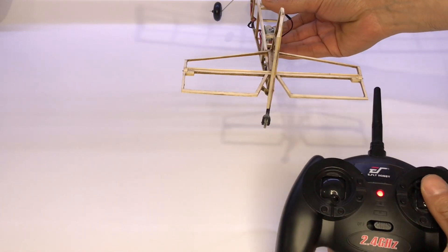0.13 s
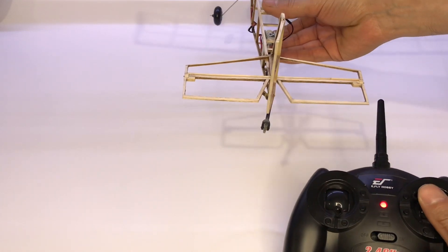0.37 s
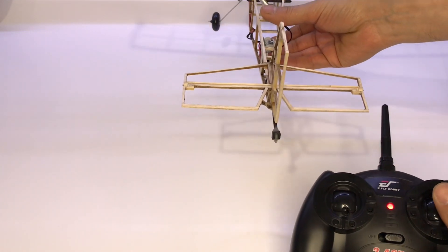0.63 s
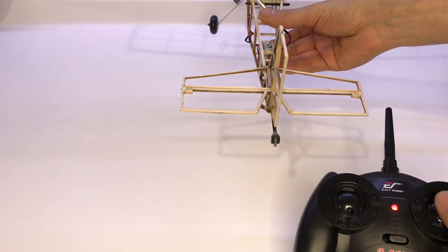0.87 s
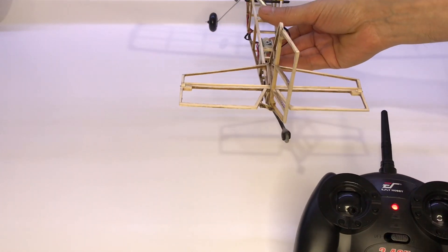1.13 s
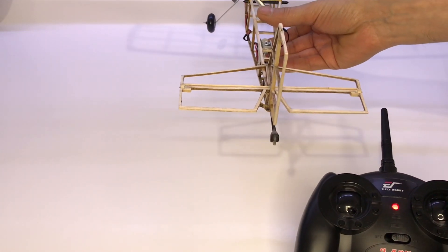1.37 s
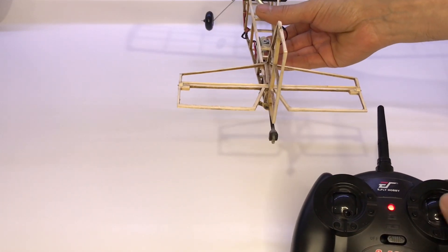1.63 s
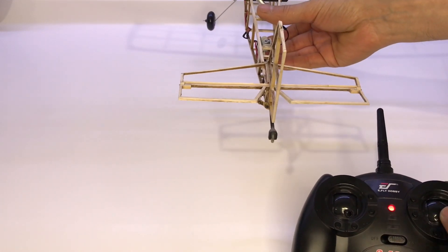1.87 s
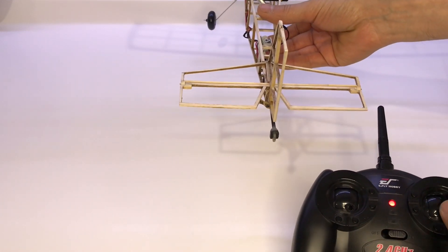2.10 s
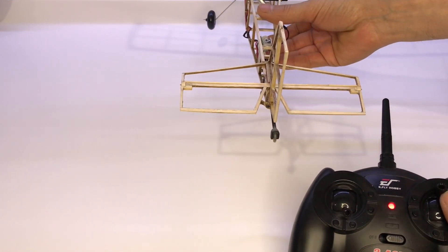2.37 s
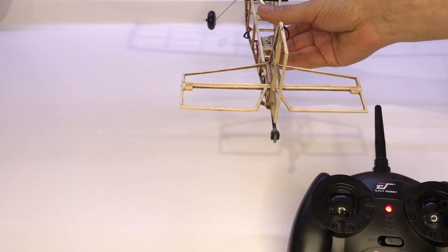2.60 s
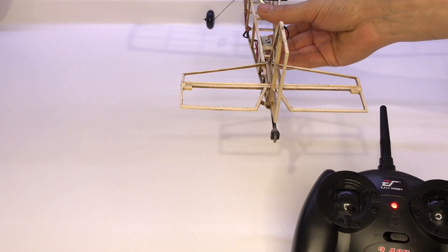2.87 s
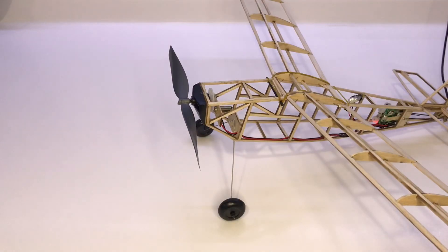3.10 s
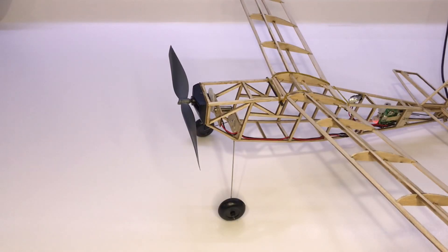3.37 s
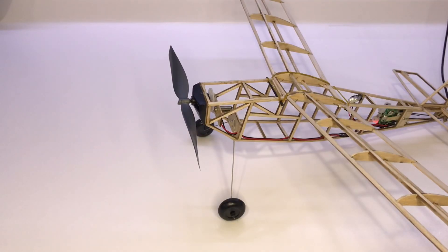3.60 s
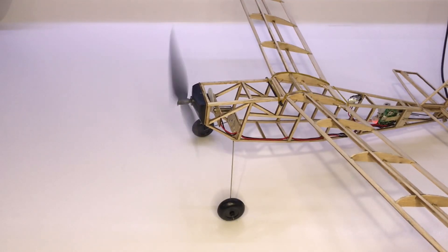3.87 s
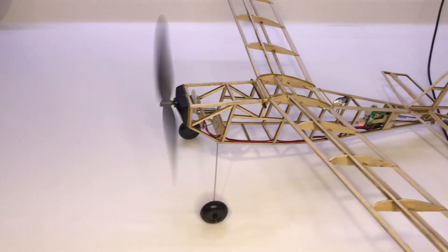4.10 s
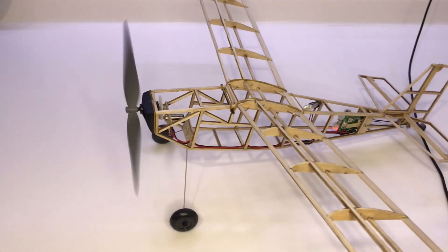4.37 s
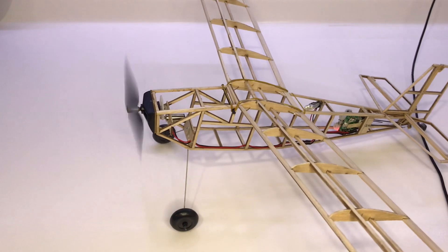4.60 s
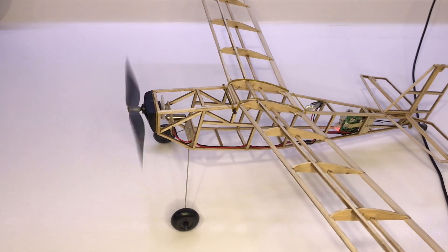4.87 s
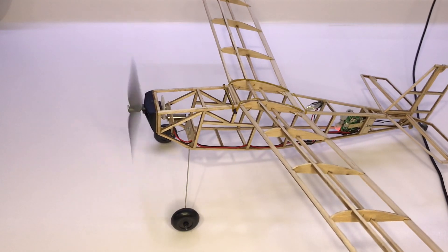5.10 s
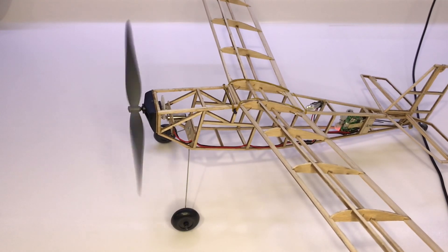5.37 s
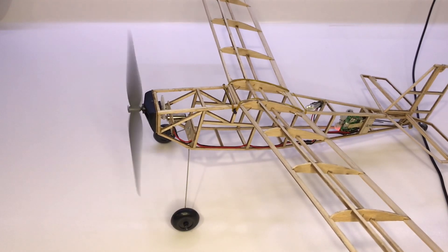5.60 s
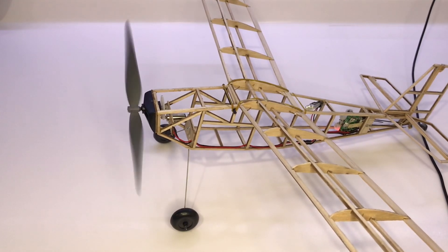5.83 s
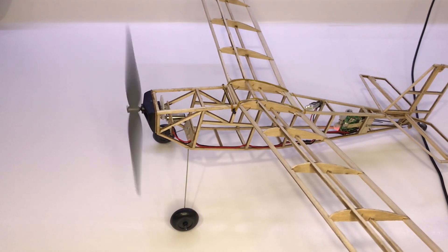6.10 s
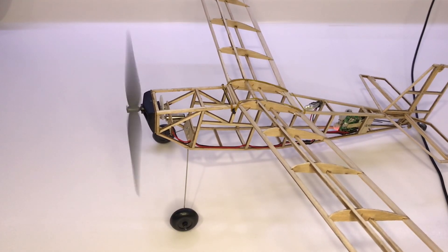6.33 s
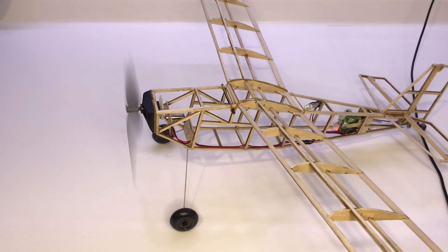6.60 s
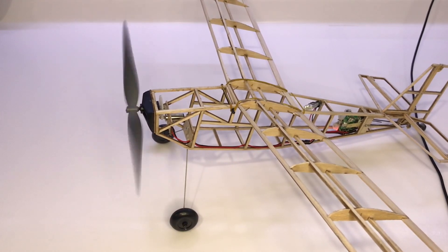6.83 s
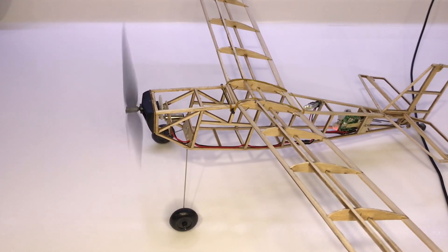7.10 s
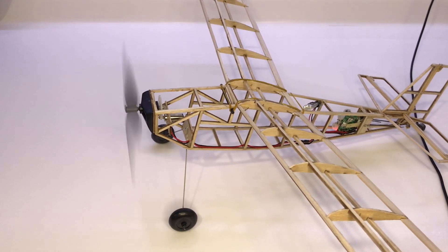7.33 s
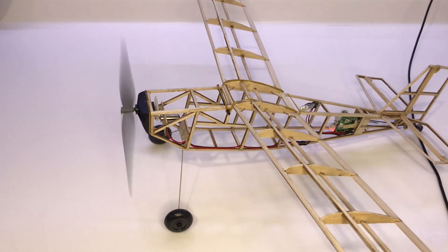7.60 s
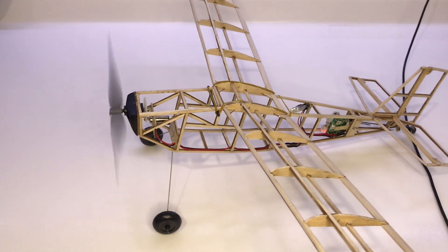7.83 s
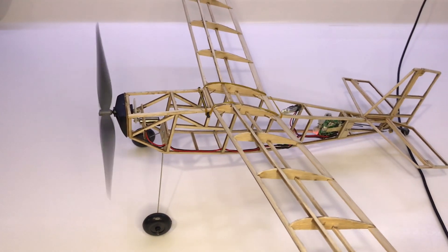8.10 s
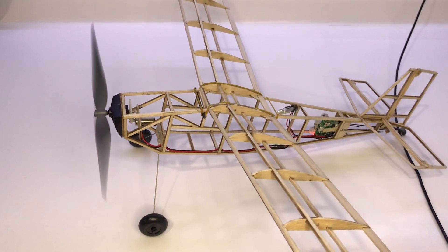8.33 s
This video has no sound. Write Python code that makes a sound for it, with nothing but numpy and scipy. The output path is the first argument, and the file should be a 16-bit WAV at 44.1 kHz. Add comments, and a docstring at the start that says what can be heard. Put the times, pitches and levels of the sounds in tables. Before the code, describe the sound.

Brief gritty servo buzzes and plastic clacks in a quiet room, then an electric propeller motor bursts, rattles down, and climbs to a steady whine.

```python
"""A balsa model aeroplane on a table in a quiet room, over a low steady hum.
From 0 s small servos whirr (dense gear clicks), control sticks knock (damped modes), a faint treble tick repeats.
At 3.8 s a geared motor spins the propeller up (shaft orders, tooth contacts), then coasts in chattering bursts.
From 5 s it runs up again to a steady whine over the singing of its speed controller (harmonics of a pulse).
"""
import sys
import numpy as np
from scipy import signal
from scipy.fft import rfft, irfft
from scipy.io import wavfile
from scipy.ndimage import uniform_filter1d

SR = 44100
rng = np.random.default_rng(int(sys.argv[2]) if len(sys.argv) > 2 else 0)


def generate_wav(signal):
    """Clip the signal to [-1, 1] and save it as 16-bit WAV at the path in sys.argv[1]."""
    frames = np.transpose(np.atleast_2d(signal))
    scaled = np.clip(frames, -1, 1) * 32767
    pcm = np.round(scaled).astype(np.int16)
    wavfile.write(sys.argv[1], SR, pcm)


def undo_db(level):
    """Turn decibels back into plain size, where 20 dB means ten times bigger."""
    steps = np.asarray(level, float) / 20
    return 10 ** steps


N = 373086

# background spectrum: [f/Hz, relative level/dB]
FLOOR_SPECTRUM = [(30, -3.5), (53, -5.5), (126, -12.5), (217, -13.5), (292, -17.5), (415, -17.5),
                  (700, -17), (1100, -21.5), (1600, -29.5), (3200, -30.5), (8000, -38.5), (15500, -40)]
# humming of far appliances: [f/Hz, width/Hz, level/dB]
APPLIANCE_PEAKS = [(49, 6.5, 10.5), (99.9, 9.6, 13), (250, 8.7, 10.5), (296.7, 13.3, 12.5), (733, 6.7, 15)]
HUM_DB = -60
# rustle of hands: [t/s, level/dB]
RUSTLE_LEVEL = [(0, -89), (2.94, -89), (3.0, -67.5), (3.3, -71), (3.55, -63), (3.75, -79), (8.46, -59.5)]
# brief dip in the background level: (t/s, half length/s, level/dB)
BACKGROUND_DIP = (2.927, 0.028, -23)

# nudges of the table top: [t/s, f/Hz, level/dB before the low-pass, t60/s]
TABLE_NUDGES = [(.54, 194, -37.5, 0.12), (0.48, 150, -59, 0.11), (4.101, 257, -51, 0.43),
                (4.16, 157, -53, 0.26), (6.282, 125.6, -47.5, 0.39)]

# trains of faint treble ticks: [first t/s, last t/s]
TICK_TRAINS = [(.0309, 2.9), (3.0296, 3.75)]
TICK_PERIOD_S, TICK_DB = .1024, -70.5   # level ahead of the colouring

# pulse duty of the speed controller, one list per run: [t/s, duty (0-1)]
DUTY_COURSES = [
    [(3.757, .37), (3.8, .385), (3.84, .41), (3.9, .4), (3.96, .42), (4.08, .413), (4.14, .43), (4.2, .453),
     (4.31, .468)],
    [(5.041, .13), (5.4, .127), (5.95, .135), (6.05, .148), (6.33, .15), (6.37, .161), (6.92, .167),
     (7.03, .168), (7.12, .182), (7.35, .19), (7.6, .197), (7.95, .195), (8.12, .203), (8.46, .203)],
]
# response of the winding to harmonics 1, 2, ..: [level/dB]
WINDING_RESPONSE = [-54.5, -47.5, -60.5, -60, -55, -50.5, -53, -57.5, -50.5, -43, -39.5, -33, -48, -58, -49]
SWITCH_RATE_HZ, SAG_S = 1007.7, .045
# starting current loads the battery and the switching rate sags: [deepest t/s, f/Hz lost]
BATTERY_SAGS = [(3.8, 31), (5.04, 12.7)]
# weakening or swelling of the singing: [t/s, half length/s, level/dB]
SINGING_FADES = [(3.865, 0.2, -2), (4.255, 0.19, -10), (5.1, .4, 2.5), (7.8, 0.23, -7.5)]

# knocks of the control sticks: [t/s, strike level/dB, brightness/(dB per octave),
# crack level/dB re strike, spring level/dB re strike]
STICK_KNOCKS = [(0.245, -43.5, -5, -3, -38), (0.539, -49, -14, 3.5, -35), (0.607, -33.5, -3, -9.5, -42),
                (1.011, -41, -3, -4.5, -28), (1.249, -33.5, -7, 4.5, -26.5), (1.758, -35, 5, -13, -45),
                (1.996, -25, 6.5, -12, -29.5), (2.293, -50.5, 2, 4, -29), (2.463, -35.5, 2, -11, -23),
                (3.203, -52.5, 0, -0.5, -32), (3.379, -43, -10, 5, -36), (4.319, -35.5, -5, 0, -34)]
# modes of the plastic case: [f/Hz, level/dB, t60/s]
CASE_MODES = [(427, -21.5, 0.082), (751, -5.5, 0.049), (925, -12.5, 0.13), (1550, 5, 0.029),
              (2270, -17, 0.033), (3170, -14, 0.027), (4160, -18, 0.032), (5360, -29, .03)]
# creaks of the stick spring: [t/s, length/s, slips per s, slip level/dB]
SPRING_CREAKS = [(2.152, .048, 736, -58), (2.45, .045, 522, -57), (.49, .03, 700, -72)]
# mode of the centring spring: (f/Hz, t60/s)
SPRING_MODE = (1530, 0.54)

# spectrum of the servo gears: [f/Hz, relative level/dB]
SERVO_SPECTRUM = [(1000, -30.5), (1700, -29.5), (1880, -18.5), (2080, -20.5), (2460, -25.5), (3070, -29),
                  (3460, -18.5), (4250, -17), (4570, -20), (6500, -10), (7680, -10.5), (8900, -6.5),
                  (10200, -7), (11900, 3), (15500, -5)]
# resonances of the servo case: [f/Hz, width/Hz, level/dB]
SERVO_RESONANCES = [(1900, 54, -5), (2420, 67, 6), (3300, 140, 7.5), (3880, 100, 5.5), (4560, 130, 7),
                    (5150, 120, 2.5), (6200, 180, 3.5), (9060, 280, 3), (12100, 350, -1.5)]
# servo moves: [three shape times t/s, not always in order, gear buzz level/dB at the second,
# level drop/dB from the second to the third (negative: rise)]
SERVO_MOVES = [(0.063, .108, 0.2, -32.5, 18.5), (0.2, 0.239, 0.21, -36, -1), (0.474, .512, 0.57, -37.5, 20),
               (0.564, .606, 0.63, -36, -1.5), (0.891, 0.97, 1.046, -35, 4.5), (1.045, 1.09, 1.136, -36, 5),
               (1.15, 1.17, 1.09, -46, -1), (1.207, 1.292, 1.317, -29.5, 9),
               (1.336, 1.372, 1.347, -40.5, -11), (1.638, 1.678, 1.735, -31.5, 1.5),
               (1.972, 2.042, 2.042, -29, -1), (2.238, 2.26, 2.415, -36, 3.5),
               (2.47, 2.526, 2.534, -30, -4)]
MOVE_ATTACK_S, MOVE_RISE_DB, MOVE_SWELL_DB = 0.021, 32, 6.5   # fast rise, then a slower swell
MOVE_RELEASE_S, MOVE_FALL_DB = 0.043, 45
# a stalled servo sings: (start t/s, end t/s)
STALL_START_S, STALL_END_S = 1.765, 1.985
STALL_FADE_S, STALL_BUZZ_DB = 0.019, -62
LOW_BUZZ_DB, LOW_FOLLOWS = -47, 0.75   # low part when the buzz is at -35 dB; share of its swing
# tones of the stalled servo: [f/Hz, level/dB]
STALL_TONES = [(6045, -80), (8064, -74), (9071, -79), (11052, -84), (11090, -70), (12096, -62),
               (13114, -86), (14115, -81), (15122, -68)]

PINION_TEETH, WHEEL_TEETH = 8, 84
# motor power: [on t/s, off t/s]
POWERED_RUNS = [(3.757, 4.31), (5.04, 8.46)]
POWER_ATTACK_S, POWER_RELEASE_S = .006, 0.056
# speed the throttle asks for, one list per run: [t/s, tooth contacts per s]
THROTTLE_DEMAND = [
    [(3.757, 852), (3.84, 1556), (3.9, 2080), (4.31, 2213)],
    [(5.04, 748), (5.2, 1462), (5.5, 1631), (5.8, 1690), (6.3, 1837), (6.8, 1914), (7.35, 2064),
     (7.8, 2156), (8.46, 2152)],
]
SPIN_LAG_S, COAST_LAG_S, KICK_PER_S = .1, .41, 150   # kick: tooth contacts per s at the first start
CRUISE_PER_S = 2000   # tooth contacts per s at which the cruise levels hold
# level laws of the motor layers: (level/dB at cruise, dB per octave of speed, dB at full torque,
# dB lost unpowered, dB per octave unpowered)
HISS_LAW = (-34, 4.5, 1.5, 10, 11)
RATTLE_LAW = (-46, 0.8, 4.5, 13, 3.5)
WHINE_LAW = (-35.5, 12, -0.5, 18.5, 6.5)
# slow wavering of the motor's loudness: [t/s, level/dB]
MOTOR_WAVERING = [(3.76, -2.5), (3.85, 3.1), (3.94, -2.5), (4.03, 1.1), (4.15, 0.1), (4.3, -1.1),
                  (4.6, 1.3), (5.0, -0.6), (5.05, 0.5), (5.15, -1.1), (5.3, -1.1), (5.45, -0.2), (5.6, 1.4),
                  (6.0, 0.35), (6.5, 1.6), (7.0, 0.4), (7.5, 1.36), (7.8, 0.5), (8.4, 0.6)]
# lines of the whine: [multiple of shaft speed]
WHINE_ORDERS = [1, 4, 7, 8, 9, 10, 13, 14, 15, 16, 17, 24, 32]
# their strengths, in the same order: [level/dB]
WHINE_ORDER_LEVELS = [-13.5, -25.5, -14.5, 0, -13.5, -46, -33, -15.5, -10.5, -2, -12.5, -0.5, -4]
# load swing at 1, 2, .. times propeller speed: [depth at full slack]
WHEEL_RUNOUT = [.55, .3, .1, .3, .1, .1]
# resonances of the frame: [f/Hz, width/Hz, level/dB]
FRAME_RESONANCES = [(1020, 230, 8.5), (1434, 230, 5), (2094, 63, 6), (2380, 320, 6), (2601, 240, 14),
                    (3720, 950, 9), (4054, 265, -10.5), (4380, 270, -5.5), (4610, 150, 3.5), (7190, 430, 7),
                    (8170, 320, 6)]
# spectrum of the tooth rattle: [f/Hz, relative level/dB]
RATTLE_SPECTRUM = [(400, -62), (900, -28), (1600, -7.5), (1900, 0.5), (2600, -9.5), (2900, -2.5),
                   (5000, -8.5), (8000, -8), (12000, -56.5)]
# spectrum of the motor hiss: [f/Hz, relative level/dB]
HISS_SPECTRUM = [(3000, -26), (4500, -9.5), (6000, -8), (7200, -12), (8500, -4.5), (9800, 1), (11400, -9.5),
                 (12500, 1.5), (14300, 5), (15700, 2)]

ROOM_T60_S, ROOM_DB = 0.33, -6
STICKS_ROOM_DB = -5   # the sticks are close by, so the room answers them less
# notch in the microphone's treble: (f/Hz, width/Hz, level/dB)
MICROPHONE_NOTCH = (10450, 130, -21)
# pass band of the whole sound, rumble removed and nothing above 16 kHz: [f/Hz, level/dB]
PASS_BAND = [(20, -50), (45, 0), (15750, 0), (16000, -70)]


def rms_one(x):
    """Normalisation: scales a signal to unit root mean square."""
    return x / np.sqrt(np.mean(x ** 2) + 1e-20)


def in_time(rows, outside=None):
    """Linear interpolation of each column over time; `outside` holds beyond the first and last rows."""
    s, *columns = np.transpose(rows)
    return [np.interp(np.arange(N) / SR, s, c, outside, outside) for c in columns]


def in_bursts(tables):
    """Gating: columns of several tables laid end to end, and a mask of where any is playing."""
    playing = sum(in_time([(t[0][0], 1), (t[-1][0], 1)], outside=0)[0] for t in tables)
    return in_time([row for t in tables for row in t]), playing


def level_bend(s, half_s, db):
    """Level modulation: a V-shaped dip, or a swell if positive, in dB."""
    return in_time([(s - half_s, 0), (s, db), (s + half_s, 0)])[0]


def drift(rate):
    """Random modulation: Gaussian knots of unit spread, `rate` per second, joined by straight lines."""
    knots = int(N / SR * rate) + 2
    return np.interp(np.arange(N) * rate / SR, np.arange(knots), rng.standard_normal(knots))


def colour(x, points, peaks=(), size=8192):
    """Minimum-phase filtering: a folded cepstrum makes a spectrum with resonances causal."""
    hz = np.maximum(np.fft.rfftfreq(size, 1 / SR), 1)
    point_hz, point_db = np.array(points).T
    db = np.interp(np.log(hz), np.log(point_hz), point_db)
    for centre_hz, width, peak_db in peaks:
        db = db + peak_db / (1 + (2 * (hz - centre_hz) / width) ** 2)
    cepstrum = irfft(np.log(undo_db(np.maximum(db, -90))))
    cepstrum[1:size // 2] *= 2
    cepstrum[size // 2 + 1:] = 0
    return signal.fftconvolve(x, irfft(np.exp(rfft(cepstrum))))[:N]


def grains(per_s, spread_db):
    """Shot noise: random clicks of uneven size and sign."""
    sizes = undo_db(spread_db * np.minimum(rng.exponential(1, N), 5)) * rng.choice([-1, 1], N)
    return sizes * (rng.random(N) < per_s / SR)


def impulses(at, db):
    """Impulsive excitation: single-sample blows of given levels at given samples."""
    blows = np.zeros(N)
    blows[at] = undo_db(db)
    return blows


def ring(clicks, hz, t60):
    """Damped resonance: a two-pole mode falls by 60 dB in t60 seconds after each click."""
    r, w = undo_db(-60 / (t60 * SR)), 2 * np.pi * hz / SR
    return signal.lfilter([0, np.sin(w)], [1, -2 * r * np.cos(w), r * r], clicks + 1e-18)


def decay(clicks, t60):
    """Exponential decay: each click starts an envelope that falls by 60 dB in t60 seconds."""
    return signal.lfilter([1], [1, -undo_db(-60 / (t60 * SR))], clicks)


def room_noise():
    """Coloured noise: a low steady hum through resonances, and a light rustle of hands made of grains."""
    hum = rms_one(colour(rng.standard_normal(N), FLOOR_SPECTRUM, APPLIANCE_PEAKS))
    brushing = grains(2500.0, spread_db=3.0) * undo_db(2.0 * drift(25))
    rustle = rms_one(colour(brushing, [(300, -12), (900, -3), (2800, 0), (5000, -4), (9000, -14), (15000, -16)]))
    return undo_db(level_bend(*BACKGROUND_DIP)) * (undo_db(HUM_DB) * hum + undo_db(in_time(RUSTLE_LEVEL)[0]) * rustle)


def room(x):
    """Reverberation: convolution with a diffuse, exponentially decaying tail, duller than the direct sound."""
    t = np.arange(SR // 2) / SR
    tail = rng.standard_normal(len(t)) * undo_db(-60 * t / ROOM_T60_S) * (t > .004)
    tail = signal.lfilter([1], [1, -.65], tail)
    return undo_db(ROOM_DB) * signal.fftconvolve(x, tail / np.sqrt(np.sum(tail ** 2)))[:N]


def nudges():
    """Modal excitation: soft nudges of the table top each ring one low mode."""
    out = np.zeros(N)
    for s, hz, db, t60 in TABLE_NUDGES:
        out += ring(impulses(int(s * SR), db), hz, t60)
    return signal.lfilter([.05], [1, -.95], out)


def ticks():
    """Periodic noise bursts: a short decaying puff of treble, over and over."""
    marks = np.zeros(N)
    for first, last in TICK_TRAINS:
        at = (np.arange(first, last, TICK_PERIOD_S) * SR).astype(int)
        marks[at] = undo_db(TICK_DB + rng.normal(0, 2.1, 40)[:len(at)])
    puff = decay(marks, t60=.012) * rng.standard_normal(N)
    return colour(puff, [(3000, -26), (9000, 2), (13000, 12)])


def sticks():
    """Modal excitation: knocks and spring slips strike the same case modes; knocks add a crack and a spring."""
    slips, out = np.zeros(N), np.zeros(N)
    for start, length, per_s, db in SPRING_CREAKS:
        at = start + np.cumsum(rng.normal(1, 0.15, 60).clip(.3)) / per_s
        slips[(at[at < start + length] * SR).astype(int)] = undo_db(db)
    s, strike_db, tilt_db, crack_db, spring_db = np.transpose(STICK_KNOCKS)
    at = (s * SR).astype(int)
    # every knock excites the modes in its own proportions
    strengths = rng.normal(0, 3.6, (len(at), len(CASE_MODES)))
    for k, (hz, db, t60) in enumerate(CASE_MODES):
        blows = slips * float(k < 5)   # slips reach only the five lowest modes
        blows[at] = undo_db(strike_db - 10.0 + strengths[:, k] + tilt_db * np.log2(hz / 1500))
        out += undo_db(db) * ring(blows, hz, t60)
    out += ring(impulses(at, strike_db + spring_db), *SPRING_MODE)
    crack = decay(impulses(at, strike_db + crack_db), t60=0.065) * rng.standard_normal(N)
    return out + colour(crack, [(300, -5.5), (1000, 4.0), (4000, 1.0), (7000, -7.5), (15000, -19)])


def servo_effort():
    """Maximum of envelopes: moves rise fast, most then swell and drop; the strongest at each moment counts."""
    shapes = []
    for first, second, third, db, drop_db in SERVO_MOVES:
        shape = [(first, db - MOVE_SWELL_DB - MOVE_RISE_DB),
                 (min(first + MOVE_ATTACK_S, second - .001), db - MOVE_SWELL_DB),
                 (second, db),
                 (third, db - drop_db),
                 (third + MOVE_RELEASE_S, db - drop_db - MOVE_FALL_DB)]
        shapes.append(in_time(shape, outside=-200)[0])
    return np.max(shapes, axis=0)


def servos():
    """Shot noise through resonances: tiny plastic gears chatter in clumps; effort sets the buzz, a stall sings."""
    half = STALL_FADE_S / 2
    stall = [(STALL_START_S - half, -25), (STALL_START_S + half, 0), (STALL_END_S - half, 0), (STALL_END_S + half, -25)]
    stall_db = in_time(stall, outside=-200)[0]
    buzz_db = np.maximum(servo_effort(), STALL_BUZZ_DB + stall_db)
    clumps = undo_db(1.2 * drift(700) + 0.87 * drift(90))
    chatter = colour(grains(9000.0, spread_db=3.5) * clumps, SERVO_SPECTRUM, SERVO_RESONANCES)
    low = signal.sosfilt(signal.butter(2, 5700, fs=SR, output="sos"), chatter)
    low_db = LOW_BUZZ_DB + LOW_FOLLOWS * (buzz_db + 35)
    buzz = undo_db(buzz_db) * rms_one(chatter - low) + undo_db(low_db) * rms_one(low)
    t = np.arange(N) / SR
    song = np.zeros(N)
    for hz, db in STALL_TONES:
        song += undo_db(db + 2.0 * drift(39.8)) * np.sqrt(2) * np.sin(2 * np.pi * hz * t)
    return buzz + undo_db(stall_db) * song


def controller():
    """Fourier series of a pulse: the winding sings; harmonic k of duty d has strength sin(pi k d)."""
    out, t = np.zeros(N), np.arange(N) / SR
    (duty,), playing = in_bursts(DUTY_COURSES)
    sag = np.zeros(N)
    for deepest, hz in BATTERY_SAGS:
        since = (1 + (t - deepest) / SAG_S).clip(0, 50)
        sag += hz * since * np.exp(1 - since)
    phase = 2 * np.pi * np.cumsum(SWITCH_RATE_HZ - sag) / SR
    for k, db in enumerate(WINDING_RESPONSE, start=1):
        strength = np.sin(np.pi * k * duty) + 0.082 * drift(60)
        out += undo_db(db + 0.43 * drift(30)) * np.sqrt(2) * strength * np.sin(k * phase + k * k)
    return playing * undo_db(sum(level_bend(*fade) for fade in SINGING_FADES)) * out


def speed():
    """First-order lag: the tooth rate trails the demand while powered and decays exponentially without power."""
    out, t = np.full(N, float(KICK_PER_S)), np.arange(N) / SR
    r = np.exp(-1 / (SPIN_LAG_S * SR))
    for demand, (on, off) in zip(THROTTLE_DEMAND, POWERED_RUNS):
        driven, after = (t >= on) & (t < off), t >= off
        now = out[driven][0]
        out[driven] = signal.lfilter([1 - r], [1, -r], in_time(demand)[0][driven], zi=[r * now])[0]
        out[after] = out[driven][-1] * np.exp(-(t[after] - off) / COAST_LAG_S)
    return out


def layer_db(law, rate, torque, coasting):
    """Power law: level changes with speed and torque, plus a slow wavering, and drops when the power goes."""
    cruise_db, slope_db, torque_db, lost_db, coast_slope_db = law
    octaves = np.log2(rate / CRUISE_PER_S)
    driven = slope_db * octaves + torque_db * torque
    unpowered = coast_slope_db * octaves - lost_db
    return cruise_db + in_time(MOTOR_WAVERING)[0] + (1 - coasting) * driven + coasting * unpowered


def gear_whine(shaft, wheel, play, runout, torque):
    """Order synthesis: sines at multiples of shaft speed, modulated by the wheel, ring in the frame."""
    # orders between the tooth rates come from an off-centre pinion and throb with each propeller turn
    throb = 1.1 * np.sin(wheel + 1) + .3 * np.sin(wheel / 2)
    whine = np.zeros(N)
    for order, db in zip(WHINE_ORDERS, WHINE_ORDER_LEVELS):
        between = order % PINION_TEETH > 0
        torque_db = (-4.4 if between else 4.36) + 8.0 * (order == 16)
        strength = undo_db(db + torque * torque_db + 2.0 * drift(40))
        swing = 1 + (between and order > 1) * throb
        whine += strength * swing * np.sin(order * (shaft + play) + order * order)
    return colour(runout * whine, [(200, -21), (600, -10.5), (1200, -14.5), (2500, -8.0), (3700, -8.0),
                                   (4600, -14.5), (8000, -22)], FRAME_RESONANCES)


def gear_rattle(teeth, runout, playing):
    """Periodic impacts: uneven teeth repeat with the gears' turns, over random grains, and ring in the frame."""
    contact = np.diff(np.floor(teeth), prepend=0) > 0
    tooth = teeth.astype(int)
    # each wheel tooth and each pinion tooth has its own shape
    flaws = rng.standard_normal(WHEEL_TEETH)[tooth % WHEEL_TEETH]
    flaws = flaws + 0.21 * rng.standard_normal(PINION_TEETH)[tooth % PINION_TEETH]
    rattle = rms_one(contact * flaws) + 2.1 * rms_one(grains(6000.0, spread_db=4.0))
    return rms_one(playing * colour(runout * rattle, RATTLE_SPECTRUM, FRAME_RESONANCES))


def motor_hiss(shaft, wheel, playing):
    """Modulated shot noise: dense grains ring in the frame and pulse with shaft and propeller."""
    gate = undo_db(0.42 * np.sin(shaft) + 0.82 * np.sin(2 * wheel) + 2.42 * drift(150))
    return rms_one(playing * gate * colour(grains(12000.0, spread_db=1.0), HISS_SPECTRUM, FRAME_RESONANCES))


def motor():
    """Gear meshing: one tooth count drives whine, rattle and hiss; torque closes the slack, coasting frees it."""
    (first, off), (again, _) = POWERED_RUNS
    rate = speed()
    playing = in_time([(first, 0), (first + POWER_ATTACK_S, 1)])[0]
    coasting = in_time([(off - POWER_RELEASE_S / 2, 0), (off + POWER_RELEASE_S, 1),
                        (again, 1), (again + POWER_ATTACK_S, 0)])[0]
    teeth = np.cumsum(rate * (1 + .0012 * drift(60))) / SR
    shaft, wheel = 2 * np.pi * teeth / PINION_TEETH, 2 * np.pi * teeth / WHEEL_TEETH
    # torque while speeding up presses the teeth together: less slack, brighter whine
    torque = np.tanh(uniform_filter1d(np.gradient(rate) * SR, size=3000).clip(0) / 3000)
    slack = 1 - .5 * torque
    # an out-of-round wheel loads the teeth unevenly: sidebands at propeller speed
    swing = sum(depth * np.sin(k * wheel + k * k) for k, depth in enumerate(WHEEL_RUNOUT, start=1))
    runout = 1 + slack * swing
    # play shakes the timing, most when no power holds the teeth together: high orders smear first
    jitter = (.022 + .16 * coasting) * drift(250)
    play = slack * (.04 * np.sin(wheel) + .03 * np.sin(wheel * 4.0) + jitter)
    whine = gear_whine(shaft, wheel, play, runout, torque)
    rattle = gear_rattle(teeth, runout, playing)
    hiss = motor_hiss(shaft, wheel, playing)
    # unpowered, the slack teeth chatter in bursts
    burst_phase = 2 * np.pi * np.cumsum(58 * (1 + 0.14 * drift(8.8))) / SR
    chatter = undo_db(coasting * (6.8 * np.sin(burst_phase) + 2.0 * drift(40)))
    layers = [(HISS_LAW, hiss), (RATTLE_LAW, rattle), (WHINE_LAW, whine)]
    return playing * chatter * sum(undo_db(layer_db(law, rate, torque, coasting)) * x for law, x in layers)


def scene():
    """Superposition: direct sounds, the room's answer to plane and sticks, and the background."""
    background = room_noise() + nudges()
    singing = controller()
    hands = sticks()
    plane = ticks() + servos() + motor()
    reverberation = room(plane + undo_db(STICKS_ROOM_DB) * hands)
    mono = background + singing + hands + plane + reverberation
    return np.array([mono, mono])


def roll_off(x):
    """The treble ends steeply here."""
    return signal.sosfilt(signal.butter(12, 16470, fs=SR, output="sos"), x)


def record(dry):
    """Linear filtering: the pass band of the whole sound and one microphone's treble notch, on both channels."""
    heard = colour(dry[0], PASS_BAND, [MICROPHONE_NOTCH])
    return roll_off(np.array([heard, heard]))


dry = scene()
out = record(dry)
generate_wav(out)
```